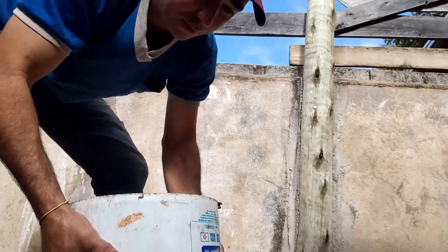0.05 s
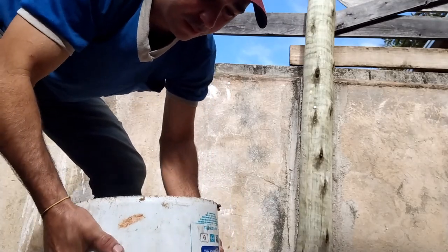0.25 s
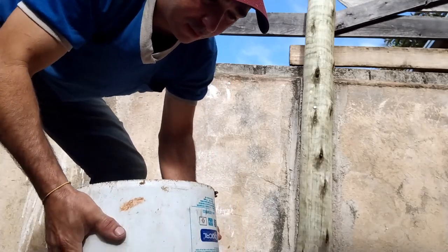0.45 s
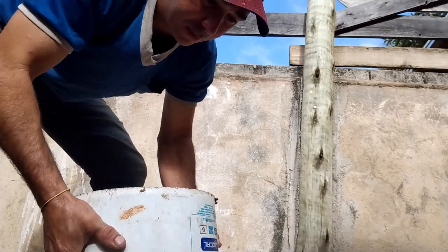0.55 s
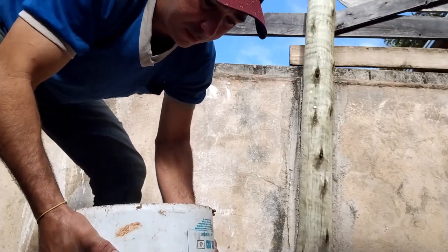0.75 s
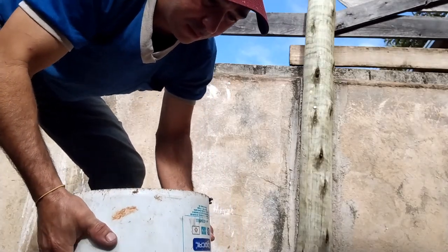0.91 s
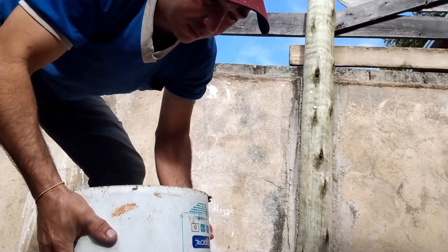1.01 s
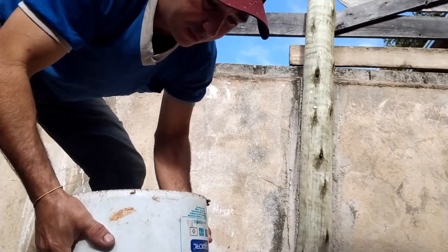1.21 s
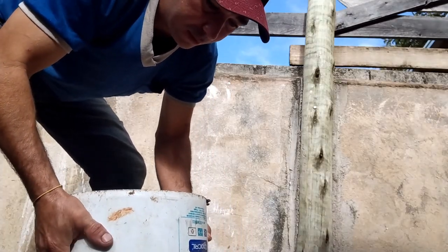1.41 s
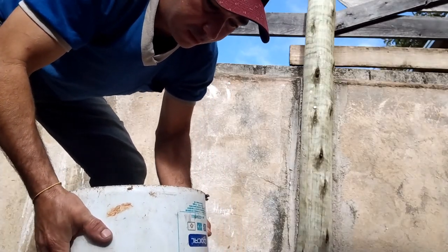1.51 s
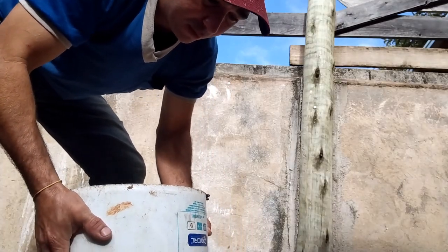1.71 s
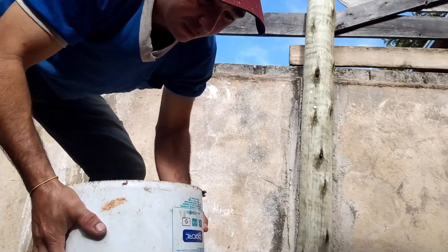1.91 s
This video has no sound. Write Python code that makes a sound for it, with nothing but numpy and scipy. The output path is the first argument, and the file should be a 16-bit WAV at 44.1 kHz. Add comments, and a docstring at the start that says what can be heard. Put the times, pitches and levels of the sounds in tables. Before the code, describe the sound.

Two dull hollow bucket thuds, then water sloshing, slapping and gulping against the plastic walls

```python
"""Water bucket rocked in a yard

A plastic bucket with water in it is tipped and rocked by hand in a walled work yard, close to the microphone.
Twice its rim scuffs (noise) and it lands with a dull thud (decaying modes and a low boom). Water sloshes and
spatters (streams of ringing bubbles, noise bursts) and gulps (rising tones); a hand squeaks on the plastic.
The walls return a short diffuse tail; moving air rumbles faintly on the microphone (filtered noise)."""
import sys
import numpy as np
from scipy import signal
from scipy.fft import rfft, irfft, next_fast_len
from scipy.io import wavfile
from scipy.ndimage import map_coordinates

SR = 44100
rng = np.random.default_rng(int(sys.argv[2]) if len(sys.argv) > 2 else 0)


def wav_record(signal):
    """Record a signal, one row per channel, as 16-bit PCM in the file named by sys.argv[1]."""
    frames = np.transpose(np.atleast_2d(signal))
    bounded = np.clip(frames, -1, 1)
    # unit amplitude maps onto the largest positive 16-bit level
    quanta = np.round(bounded * 32767).astype(np.int16)
    wavfile.write(sys.argv[1], SR, quanta)


N = 85995
TOP_HZ = 15800

# Bucket contacts; the first landing is rim, then base. Each row: start in seconds, level in dB,
# contact time in ms, crack in dB, wall rattle in dB.
KNOCKS = [(0.2118, 6, 1.47, -21, -30.5), (0.2175, -8, 1.9, -16, -23), (0.7546, 6, 1.1, -22, -21)]
# Bucket modes. Each row: frequency in Hz, level in dB, t60 in seconds.
BUCKET_MODES = [(126.6, -29, 0.13), (182.5, -27.5, 0.098), (224, -17, 0.041), (277, -29, 0.067),
                (325, -43, 0.077), (410.5, -19.5, 0.032), (501, -25.5, 0.044), (551, -34, 0.039),
                (820, -36, 0.05), (950, -35, 0.13), (1145, -30, 0.066), (1270, -28, 0.088),
                (1360, -39, 0.066), (2257, -26, 0.1)]
# Crack spectrum. Each row: frequency in Hz, relative density in dB per Hz.
CRACK_SPECTRUM = [(300, 15), (1000, 12), (2000, 2.5), (4200, 9), (6000, -6.5), (9500, 0.5), (15500, -13)]
# Wall rattle spectrum. Each row: frequency in Hz, relative density in dB per Hz.
RATTLE_SPECTRUM = [(35, -19), (140, 8.5), (500, -4.5), (750, -17), (1300, -19), (1900, -23), (4000, -30.5),
                   (9000, -28.5), (15500, -42)]
# Rim dragging just before it lands. Each row: start in seconds, level in dB.
SCUFFS = [(0.207, -12), (0.738, -11.5)]
PUSH_S = 0.00075  # the wall gives way and springs back
BOOM_S, BOOM_DB, BOOM_HZ, BOOM_T60_S, BOOM_RISE_S = 0.2062, 0.5, 61.4, 0.062, 0.0049
CRACK_T60_S, CRACK_RISE_S = 0.018, 0.00039
RATTLE_T60_S, RATTLE_RISE_S = 0.29, 0.00066
RATTLE_ROUGH_DB, RATTLE_CHATTER_PER_S = 2, 260
SCUFF_RISE_S, SCUFF_T60_S = 0.005, 0.07


def knocks():
    """Each contact pushes the wall, rings it, cracks and leaves it chattering; the first landing booms the base."""
    body, t = np.zeros(N), np.arange(SR // 4) / SR
    push = (1 - t / PUSH_S) * np.exp(-t / PUSH_S)
    for s, db, contact_ms, _, _ in KNOCKS:
        ring = np.zeros(len(t))
        for k, (hz, level_db, t60) in enumerate(BUCKET_MODES):
            gain = (-1) ** k * amp(level_db + rng.normal(0, 1))
            ring += gain * np.sin(2 * np.pi * hz * t) * decay(t, t60)
        force = t * np.exp(-2 * np.pi * 1000 * t / contact_ms)
        thud = signal.fftconvolve(push + ring, force / force.sum())[:len(t)]
        add(body, s, amp(db) * thud)
    boom = np.sin(2 * np.pi * BOOM_HZ * t) * fade(t, BOOM_RISE_S, BOOM_T60_S)
    add(body, BOOM_S, -amp(BOOM_DB) * boom)
    crack = bursts([(s, db, CRACK_T60_S) for s, *_, db, _ in KNOCKS], CRACK_RISE_S)
    rattle = bursts([(s, db, RATTLE_T60_S) for s, *_, db in KNOCKS], RATTLE_RISE_S)
    scuff = bursts([(s, db, SCUFF_T60_S) for s, db in SCUFFS], SCUFF_RISE_S)
    chatter = unit(amp(RATTLE_ROUGH_DB * wobble(RATTLE_CHATTER_PER_S)))
    cracking = crack * tinted(noise(), CRACK_SPECTRUM)
    rattling = (rattle + scuff) * chatter * tinted(inside(noise()), RATTLE_SPECTRUM)
    return body + cracking + rattling


# Fine spray spectrum. Each row: frequency in Hz, relative density in dB per Hz.
SPRAY_SPECTRUM = [(600, -23), (1500, -10.5), (2200, -22), (3100, -3), (3800, 3.5), (5600, -1), (7500, 4.5),
                  (9200, 4.5), (11500, -4.5), (15500, -11)]
# Plopping bubble spectrum. Each row: frequency in Hz, relative density in dB per Hz.
PLOP_SPECTRUM = [(300, -18), (550, 6.5), (950, 0.5), (1400, -2), (2200, 1.5), (4500, -11), (8000, -30)]
PLOPS_PER_S, CRACKLES_PER_S, CRACKLE_DB = 1100, 110, -5


def slosh():
    """Over the hollow churning, small bubbles plop, fine spray hisses and single drops crackle."""
    spray, plop, low = surge_levels()
    plops = bubble_pair(PLOPS_PER_S, hz=1396, spread=1.138, cycles=16, scatter_db=1.8, size=600)
    crackles = bubble_pair(CRACKLES_PER_S, hz=2880, spread=1.0, cycles=26, scatter_db=-1.5, size=600)
    drops = tinted(inside(droplets()), SPRAY_SPECTRUM)
    drops = drops + amp(CRACKLE_DB) * widen(unit(inside(crackles)))
    return hollow(low) + plop * tinted(inside(plops), PLOP_SPECTRUM) + spray * drops


# Water surges. Each row: crest in seconds, rise and fall time in seconds, fine spray in dB,
# plopping bubbles in dB, low slosh in dB.
SURGES = [(0.055, 0.048, -50, -46, -44), (0.327, 0.064, -50.5, -47.5, -48),
          (0.424, 0.058, -56.5, -46.5, -34.5), (0.593, 0.013, -52, -45, -38),
          (0.868, 0.017, -55, -38, -46.5), (0.956, 0.084, -43.5, -41.5, -34),
          (1.064, 0.037, -50, -44, -34.5), (1.21, 0.078, -47.5, -52, -36.5),
          (1.294, 0.048, -45.5, -39.5, -32), (1.401, 0.044, -46.5, -45.5, -31),
          (1.489, 0.054, -44.5, -40, -32), (1.573, 0.046, -44.5, -40.5, -32), (1.653, 0.063, -44, -44, -36),
          (1.828, 0.045, -49.5, -48.5, -35.5), (1.942, 0.059, -44, -77, -35.5)]
CALM_SPRAY_DB, CALM_PLOP_DB, CALM_SLOSH_DB = -64, -59, -46.5


def surge_levels():
    """Levels of spray, plops and low slosh: every surge swells and sinks over calm water, powers adding."""
    power = amp([[CALM_SPRAY_DB], [CALM_PLOP_DB], [CALM_SLOSH_DB]]) ** 2
    for s, fall, spray_db, plop_db, slosh_db in SURGES:
        t = np.arange(N) / SR - s
        swell = 1 / np.cosh(np.pi / 2 * t / fall)
        power = power + (amp([[spray_db], [plop_db], [slosh_db]]) * swell) ** 2
    return np.sqrt(power)


# Resonances of the bucket's hollow over the water. Each row: frequency in Hz, width in Hz, relative level in dB.
HOLLOW_MODES = [(149.7, 17, -4.5), (214, 86, 6.5), (253.3, 10, -6.5), (362, 95, -6), (416.7, 35.6, 9.5),
                (628, 12, -11), (778, 120, -9.5)]
BUBBLES_PER_S = 450
HOLLOW_SWAY, HOLLOW_SWAY_PER_S = 0.02, 9  # share of pitch, knots per second
DEEP_GROWS = 0.63  # exponent: the three lowest resonances need a strong surge


def hollow(level):
    """Large bubbles sound the air over the water; its resonances sway as the water moves."""
    churn = bubble_pair(BUBBLES_PER_S, hz=365, spread=1.35, cycles=2.87, scatter_db=1.5, size=1000)

    def resonate(centre, width, db):
        return filtered(churn, lambda f: amp(db) * 1j * f * width / (centre * centre - f * f + 1j * f * width))

    rings = np.array([resonate(*row) for row in HOLLOW_MODES])
    deep, upper = rings[:3].sum(axis=0), rings[3:].sum(axis=0)
    clock = np.cumsum(1 + HOLLOW_SWAY * wobble(HOLLOW_SWAY_PER_S))

    def sway(pair):
        return np.array([map_coordinates(x, [clock], order=1, mode="mirror") for x in pair])

    deep_share = (level / level.max()) ** DEEP_GROWS
    return level * widen(deep_share * sway(deep) - sway(upper)) / np.std(deep - upper)


DROPS_PER_S, FIZZ_DB = 3500, -1


def droplets():
    """Two unrelated streams of tiny bursting drops over a fizz of noise."""
    drops = bubble_pair(DROPS_PER_S, hz=4647, spread=1.17, cycles=33, scatter_db=2.8, size=300)
    return drops + amp(FIZZ_DB) * noise()


# Water slapping the wall. Each row: start in seconds, spray in dB, spray t60 in seconds, knock of the wall in dB.
SPATTERS = [(0.1596, -41.5, 0.3, -35), (0.4023, -41, 0.15, -35), (0.4437, -43, 0.092, -34),
            (0.505, -69, 0.023, -40), (0.636, -40, 0.042, -67), (0.667, -47.5, 0.2, -47),
            (0.852, -44.5, 0.23, -43), (1.1643, -38, 0.049, -35), (1.1847, -28.5, 0.021, -29.5),
            (1.2035, -31, 0.022, -37), (1.215, -36.5, 0.11, -61), (1.379, -42, 0.046, -33),
            (1.4675, -37, 0.044, -49), (1.5396, -35, 0.12, -31.5), (1.6826, -36, 0.041, -33),
            (1.774, -33.5, 0.14, -32.5)]
# Spatter spectrum. Each row: frequency in Hz, relative density in dB per Hz.
SPATTER_SPECTRUM = [(150, -18), (600, -10), (1500, -6), (4000, -2.5), (6000, -6), (8700, 1), (11500, -12),
                    (15500, -25)]
# Dull knock of a wave on the wall. Each row: frequency in Hz, relative density in dB per Hz.
SLAP_SPECTRUM = [(90, -45), (200, -12), (430, 0), (700, -6), (1000, -6), (2200, -11), (4000, -19),
                 (9000, -35)]
SPATTER_RISE_S = 0.0008
SNAP_DB, SNAP_T60_S, SNAP_RISE_S = -1.5, 0.014, 0.00072  # dB relative to the spray
SLAP_T60_S, SLAP_RISE_S = 0.042, 0.0015


def spatters():
    """A snap, a short hiss of drops and a dull knock where a wave slaps the plastic."""
    spray = bursts([(s, db, t60) for s, db, t60, _ in SPATTERS], SPATTER_RISE_S)
    snap = bursts([(s, db + SNAP_DB, SNAP_T60_S) for s, db, _, _ in SPATTERS], SNAP_RISE_S)
    wall = bursts([(s, db, SLAP_T60_S) for s, _, _, db in SPATTERS], SLAP_RISE_S)
    hiss = (spray + snap) * tinted(inside(noise()), SPATTER_SPECTRUM)
    return hiss + wall * tinted(noise(), SLAP_SPECTRUM)


# Large air pockets closing. Each row: start in seconds, level before the envelope in dB, starting pitch in Hz.
GULPS = [(0.366, -22.5, 349), (0.406, -22.5, 341), (0.443, -24, 347), (0.504, -21, 444), (0.815, -23, 178),
         (0.983, -23, 210), (0.872, -20.5, 265), (0.913, -22.5, 318), (1.272, -27.5, 233),
         (1.303, -28.5, 215), (1.387, -27.5, 235), (1.479, -17, 234), (1.52, -19.5, 414),
         (1.634, -16.5, 245), (1.668, -17.5, 215), (1.726, -30, 439), (1.776, -24.5, 420)]
GULP_T60_S, GULP_RISE_S, GULP_GLIDE_PER_S = 0.059, 0.0022, 1.4


def gulps():
    """Each trapped air pocket rings briefly, rising in pitch."""
    out, t = np.zeros(N), np.arange(SR // 4) / SR
    for s, db, hz in GULPS:
        cycles = hz * t * (1 + GULP_GLIDE_PER_S * t / 2)
        add(out, s, amp(db) * np.sin(2 * np.pi * cycles) * fade(t, GULP_RISE_S, GULP_T60_S))
    return out


# Squeak spectrum. Each row: frequency in Hz, relative density in dB per Hz.
SQUEAK_SPECTRUM = [(2000, -19), (4600, -7), (9000, -28)]
SQUEAK_S, SQUEAK_DB, SQUEAK_T60_S, SQUEAK_RISE_S = 1.7265, -34, 0.048, 0.0022


def squeak():
    """A hand slips: a short, thin scratch of skin on plastic."""
    return bursts([(SQUEAK_S, SQUEAK_DB, SQUEAK_T60_S)], SQUEAK_RISE_S) * tinted(noise(), SQUEAK_SPECTRUM)


INSIDE_ECHO_S, INSIDE_ECHO_GAIN = 0.016, 0.24  # longest delay, gain of each echo


def inside(pair):
    """A few quick echoes of either sign between the walls of the bucket colour the sound."""
    draws = rng.random((8, 2))

    def echoes(hz):
        response = 1
        for delay, sign in draws:
            turn = np.exp(-2j * np.pi * hz * INSIDE_ECHO_S * delay)
            response = response + INSIDE_ECHO_GAIN * np.sign(sign - .5) * turn
        return response

    return filtered(pair, echoes)


# Tail of the yard. Each row: frequency in Hz, t60 in seconds.
YARD_T60 = [(100, 0.54), (500, 0.24), (3000, 0.47), (12000, 0.065)]
YARD_DB = -15


def yard(x):
    """The walls answer with a short diffuse tail, its highest treble dying fastest."""
    hz, t, z = signal.stft(rng.standard_normal((2, SR // 2)), SR, nperseg=256)
    tail = signal.istft(z * decay(t, along(YARD_T60, hz)[:, None]), SR, nperseg=256)[1]
    late = np.pad(x.mean(axis=0), (300, 0))  # delay in samples
    return widen(signal.fftconvolve(late[None], tail / np.linalg.norm(tail[0]), axes=1)[:, :N])


# Rumble level. Each row: time in seconds, level in dB.
RUMBLE_LEVEL = [(0, -42.5), (0.15, -37), (0.29, -33), (0.42, -37.5), (0.68, -36.5), (0.86, -51),
                (1.14, -42), (1.21, -48), (1.35, -38), (1.44, -48.5), (1.95, -46)]
# Rumble spectrum. Each row: frequency in Hz, relative density in dB per Hz.
RUMBLE_SPECTRUM = [(15, -0.5), (35, -4), (65, -10.5), (110, -15.5), (400, -48)]
# Outdoor floor spectrum. Each row: frequency in Hz, relative density in dB per Hz.
AIR_SPECTRUM = [(50, -16), (400, 13), (800, 1), (2500, -4), (15500, -47)]
AIR_DB = -58


def air():
    """Low buffeting of moving air on the microphone over a quiet outdoor floor."""
    rumble_db = np.interp(np.arange(N) / SR, *np.transpose(RUMBLE_LEVEL))
    return amp(rumble_db) * tinted(noise(), RUMBLE_SPECTRUM) + amp(AIR_DB) * tinted(noise(), AIR_SPECTRUM)


def bubbles(rate, hz, spread, cycles, scatter_db, size):
    """A stream of small ringing bubbles of random pitch and strength, t60 in cycles, rms 1."""
    count = int(rate * N / SR)
    when, strength, tone = np.random.default_rng(rng.integers(2 ** 31)).random((count, 3)).T
    pitch = np.clip(hz * np.exp(spread * (2 * tone - 1)), 20, TOP_HZ)[:, None]
    t = np.arange(size) / SR
    level_db = -scatter_db * np.log(np.maximum(1 - strength, .01))
    gain = amp(level_db)[:, None] * np.sqrt(pitch)
    rings = gain * np.sin(2 * np.pi * pitch * t) * decay(t, cycles / pitch)
    at = (when * N).astype(int)[:, None] + np.arange(size)
    return unit(np.bincount(at.ravel(), rings.ravel(), N + size)[:N])


def bubble_pair(rate, **kind):
    """Two unrelated bubble streams."""
    return np.array([bubbles(rate, **kind) for _ in range(2)])


def noise():
    """Two unrelated white noises."""
    return rng.standard_normal((2, N))


def wobble(rate):
    """A smooth random curve, rate knots a second."""
    return map_coordinates(rng.standard_normal(int(N * rate / SR) + 4), [np.arange(N) * rate / SR])


def decay(t, t60):
    """Exponential decay, 60 dB in t60."""
    return np.exp(-np.log(1000) * t / t60)


def fade(t, rise, t60):
    """Quick attack and exponential decay."""
    return (1 - np.exp(-t / rise)) * decay(t, t60)


def add(out, s, sound):
    """Mix a short sound in at a moment in seconds."""
    part = out[..., round(s * SR):][..., :sound.shape[-1]]
    part += sound[..., :part.shape[-1]]


def bursts(rows, rise):
    """Envelope of (start s, dB, t60 s) bursts."""
    out, t = np.zeros(N), np.arange(SR // 3) / SR
    for s, db, t60 in rows:
        add(out, s, amp(db) * fade(t, rise, t60))
    return out


def amp(db):
    """Decibels to gain."""
    return 10 ** (np.asarray(db) / 20)


def unit(x):
    """Scale to rms 1."""
    return x / np.sqrt(np.mean(x ** 2) + 1e-20)


def along(points, hz):
    """Interpolate (Hz, value) points on a log frequency axis."""
    f, v = np.transpose(points)
    return np.interp(np.log(hz + 1), np.log(f + 1), v)


def filtered(x, response):
    """x times a complex response of frequency."""
    m = next_fast_len(N + SR // 2)
    return irfft(rfft(x, m) * response(np.fft.rfftfreq(m, 1 / SR)), m)[..., :N]


# Stereo width. Each row: frequency in Hz, side minus mid in dB.
WIDTH = [(60, -5.5), (200, -17), (380, -13), (700, -3.5), (2400, -3), (8000, 0)]


def widen(pair):
    """Two unrelated signals, as mid and side, to left and right: narrowest near 200 Hz, wide treble."""
    side = filtered(pair[1], lambda hz: amp(along(WIDTH, hz)))
    return np.array([pair[0] + side, pair[0] - side])


def tinted(pair, spectrum):
    """Stereo sound shaped by the given spectrum, the pair at rms 1 before widening."""
    return widen(unit(filtered(pair, lambda hz: amp(along(spectrum, hz)))))


def scene():
    """Bucket and water between the walls; only the short events feed the yard's tail."""
    hits = knocks() + spatters() + gulps() + squeak()
    return hits + amp(YARD_DB) * yard(hits) + slosh() + air()


LOW_CUT_HZ = 35


def record(dry):
    """The recorder sheds the deepest bass and keeps nothing above its band limit."""
    return filtered(dry, lambda hz: 1j * hz / (LOW_CUT_HZ + 1j * hz) * (hz < TOP_HZ))


dry = scene()
out = record(dry)
wav_record(out)
```